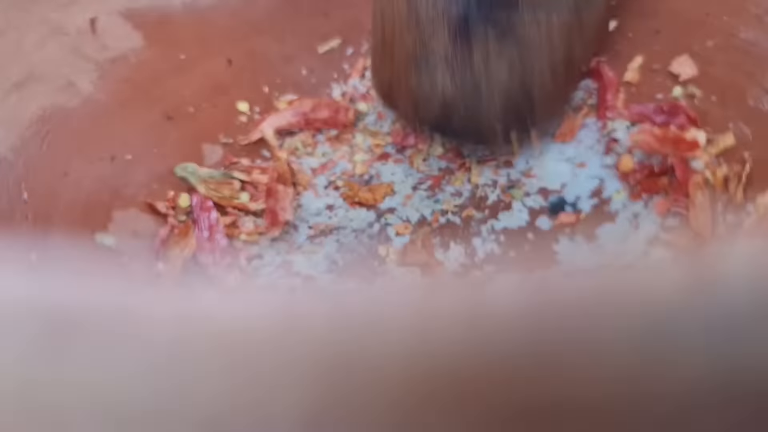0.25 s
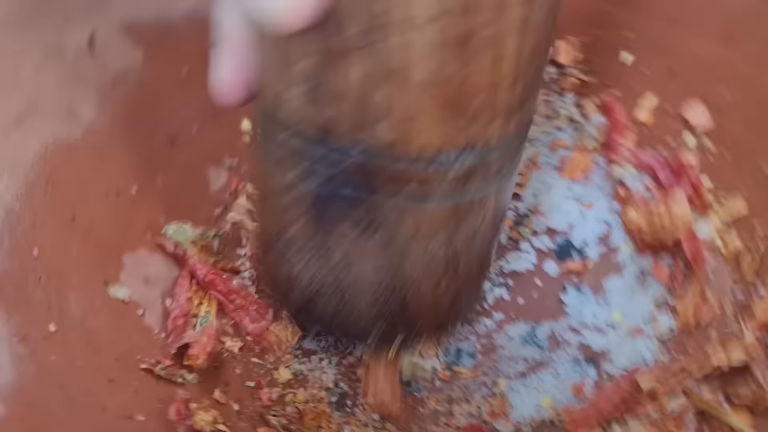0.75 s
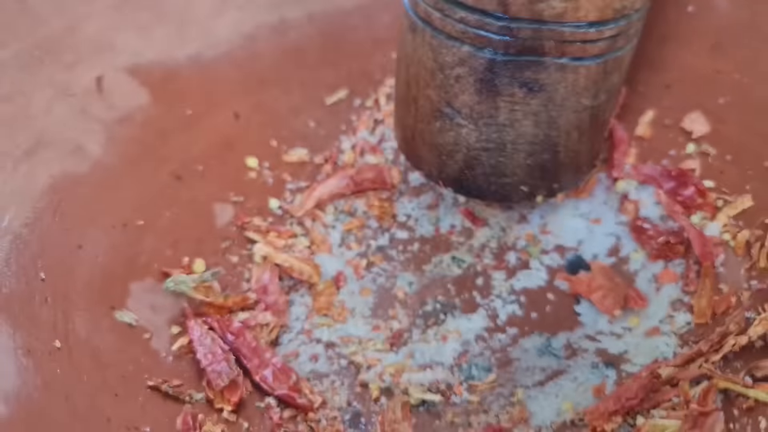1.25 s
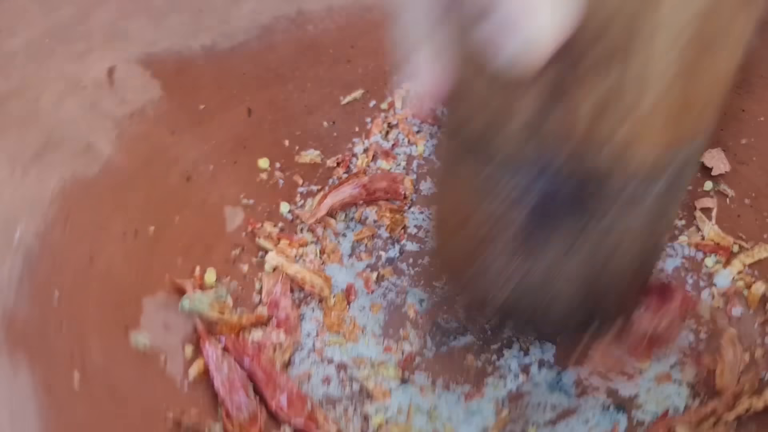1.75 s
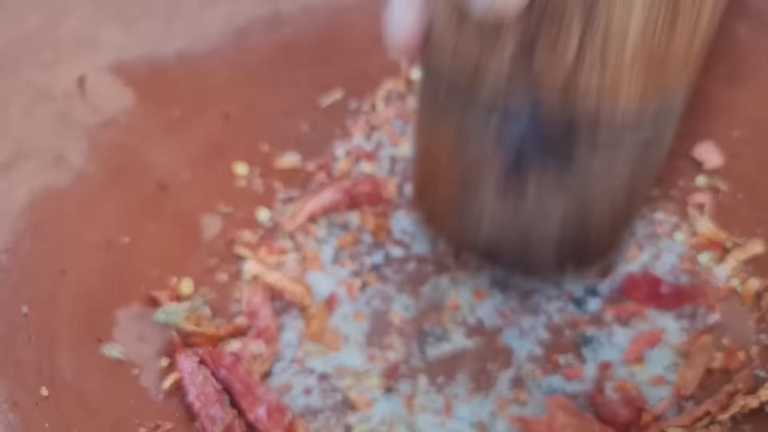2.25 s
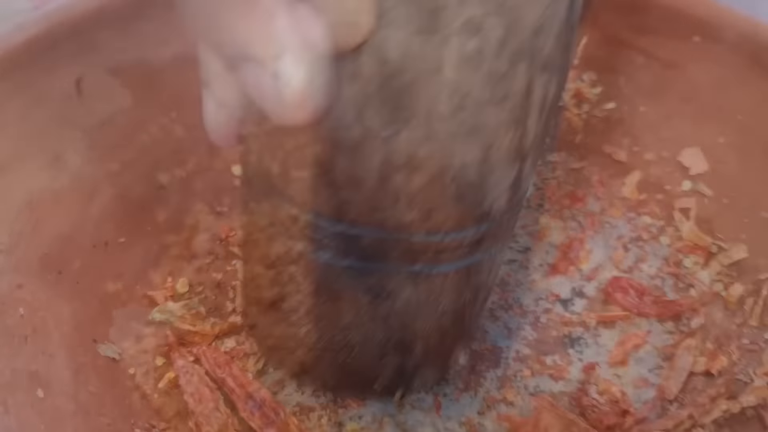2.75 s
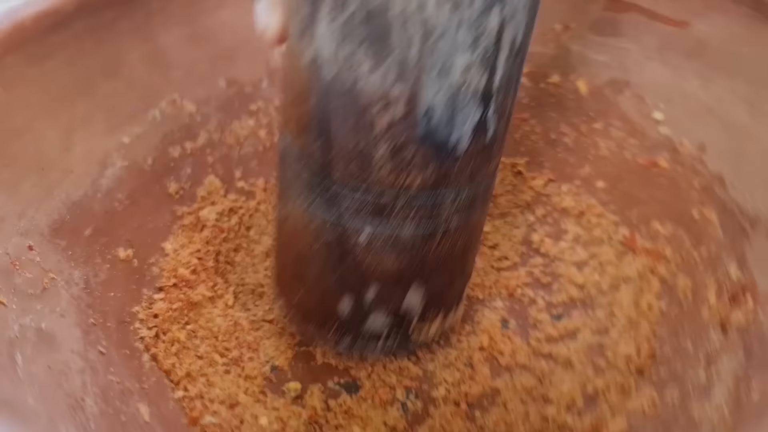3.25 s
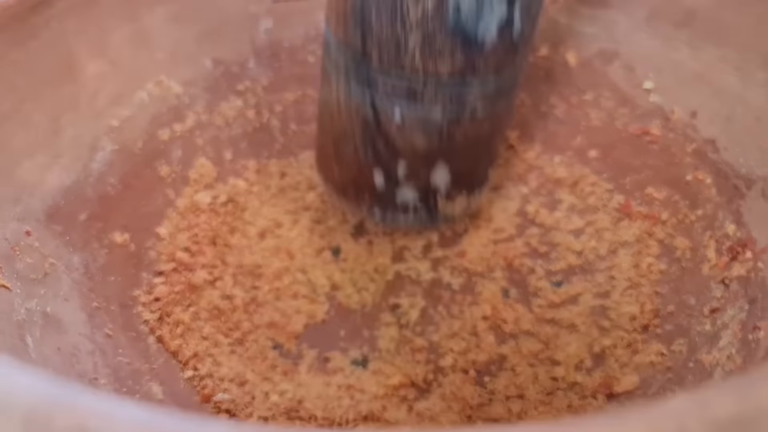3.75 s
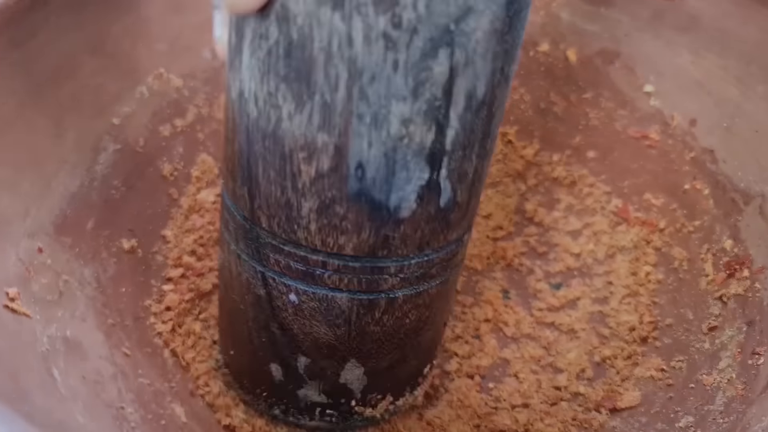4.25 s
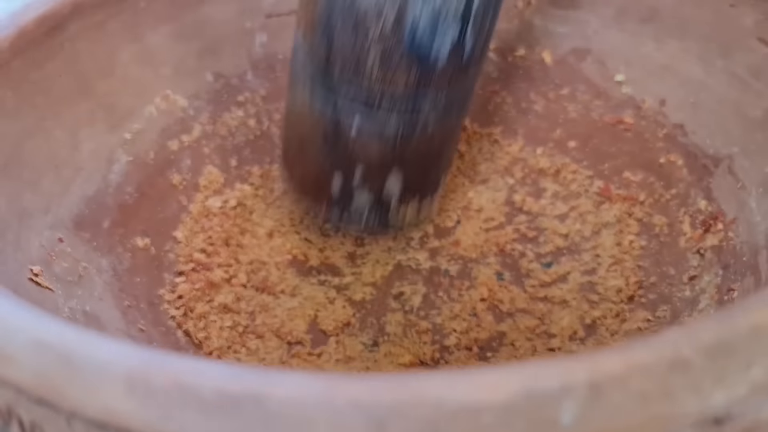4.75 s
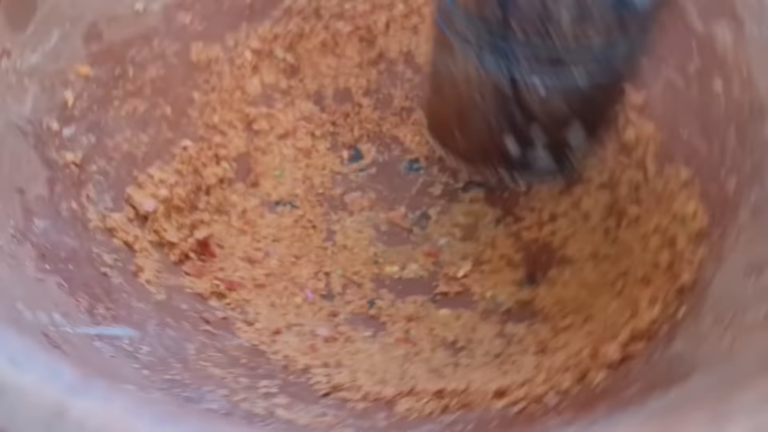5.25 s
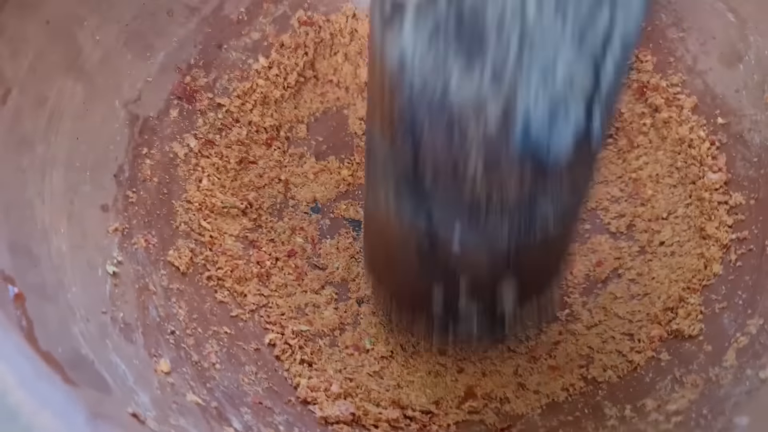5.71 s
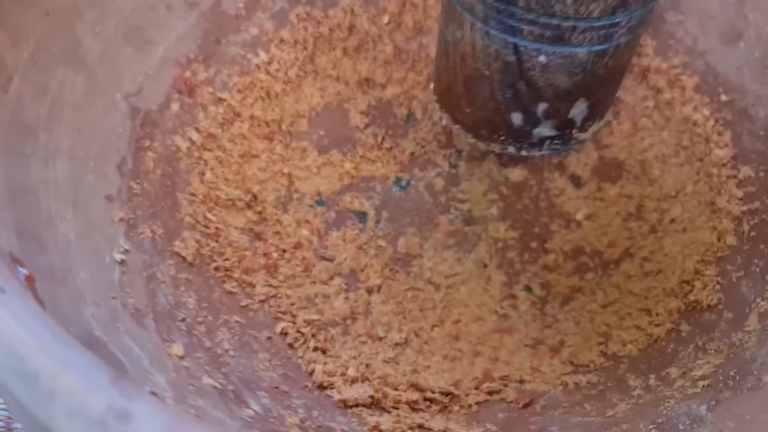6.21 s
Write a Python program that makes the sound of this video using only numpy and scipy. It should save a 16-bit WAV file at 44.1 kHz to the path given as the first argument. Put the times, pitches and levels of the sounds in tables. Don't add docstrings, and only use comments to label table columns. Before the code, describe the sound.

A wooden pestle scrubs salt and dried chilli to and fro in a clay bowl, gritty crunching strokes with low thuds, growing heavier and duller.

```python
import sys
import numpy as np
from scipy import signal
from scipy.fft import rfft, irfft
from scipy.io import wavfile
from scipy.ndimage import uniform_filter1d

SR = 44100
rng = np.random.default_rng(int(sys.argv[2]) if len(sys.argv) > 2 else 0)


def attenuation_scalar(level_db):
    decades = np.asarray(level_db, float) / 20
    return 10 ** decades


def waveform_to_disk(signal):
    frames = np.transpose(np.atleast_2d(signal))
    scaled = np.clip(frames, -1, 1) * 32767
    samples = np.round(scaled).astype(np.int16)
    wavfile.write(sys.argv[1], SR, samples)


N = 285561

# start_s, grit_db, lean_db (half the rise of force from early to #
# late), turn_db (left at the turn), weight_db
STROKES = [(0.012, -36.5, -4, -28, -36.5), (0.15, -43.5, 4, -8.5, -42), (0.254, -37, -3.5, -25, -55),
           (0.4, -36, 1, -9, -35), (0.565, -32.5, -4, -45, -44.5), (0.705, -34, 2, -26, -37),
           (0.867, -31.5, 6, -40, -46), (1, -39, 6, -33, -38), (1.081, -36.5, -8, 0, -34),
           (1.186, -36, -3.5, -23, -50), (1.329, -31, -0.5, -20, -31.5), (1.505, -101, 12, -10, -70),
           (1.721, -55, 3, -19, -58), (1.764, -32.5, -3, -30, -31.5),
           (1.923, -38.5, 6.5, -43, -41.5), (2.076, -31.5, 5, -28, -30),
           (2.234, -35, -2.5, -33, -43.5), (2.395, -30.5, -6, -22, -29),
           (2.532, -31.5, 2.5, -44, -35.5), (2.684, -31, -4, -29, -32.5),
           (2.867, -33.5, -4.5, -11.5, -41),
           (3.016, -34.5, -0.5, -11, -36), (3.179, -32, 1.5, -44, -34.5),
                  (3.344, -32.5, -2.5, -46, -42.5), (3.491, -32, -7.5, -11.5, -33.5),
                  (3.647, -34.5, -2, -23, -47), (3.808, -32.5, -3.5, -19, -33),
                  (3.957, -33.5, -1, -42, -45.5), (4.117, -31.5, -4, -25, -29.5),
                  (4.267, -34, -3.5, -40, -44), (4.431, -33, -11, -28, -33.5),
                  (4.579, -35.5, -2.5, -44, -42.5), (4.735, -31.5, -5.5, -40, -31.5),
                  (4.895, -32, -1.5, -17, -43.5), (5.055, -31.5, -4.5, -25, -32),
                  (5.19, -33.5, 0, -2.5, -52), (5.322, -33, -6, -8.5, -34), (5.431, -35, -2, -8, -37.5),
                  (5.535, -32.5, 0, -1.5, -43), (5.639, -33, -1.5, -19, -33.5), (5.788, -33, -4, -49, -42),
                  (5.943, -30.5, -7.5, -44, -29), (6.085, -33, -4, -44, -40.5),
                  (6.243, -29, -1, -22.5, -30.5), (6.389, -32.5, 5.5, -47, -37.5)]
# start_s, peak_db, push_ms
JOLTS = [(0.5927, -17, 1), (0.898, -20.5, 0.61), (0.935, -17.5, 0.61), (1.2022, -20.5, 1.5),
         (1.2351, -15.5, 1.34), (1.4038, -18, 1.4), (2.1723, -22, 1.8), (2.457, -17, 1.5),
         (2.5741, -17, 1.45), (2.728, -15.5, 1.25), (2.898, -23, 1.2), (3.2246, -21, 2.4),
         (3.3982, -13, 1.26), (3.5436, -14, 1.4), (3.8506, -7.5, 1.58), (4.1625, -16, 1.2),
         (4.3421, -15.5, 0.59), (4.4734, -12.5, 2.3), (4.7657, -10, 1.25), (5.0922, -8, 1.76),
         (5.1287, -13, 1.7), (5.1678, -5.5, 2.7), (5.356, -6, 1.45), (5.68, -7, 1.73), (5.6955, -7.5, 1.43),
         (5.7291, -6, 1.6), (5.7402, -11, 1.64), (5.993, -0.5, 1.47), (6.0385, -14.5, 1.8),
         (6.2965, -14, 2.1)]
# start_s, peak_db
KNOCKS = [(.016, -36), (.0215, -27), (.027, -7), (.0357, -10), (.0583, -27), (1.7373, -31), (1.744, -24),
          (1.7478, -27), (1.7515, -4.5), (1.7652, -13), (1.7715, -9.5), (1.7799, -8), (1.788, -20)]
# start_s, peak_db, pitch_hz
BUMPS = [(0.201, -27, 121), (0.281, -27, 109), (0.833, -19.5, 175), (1.068, -23.5, 153), (1.148, -28, 85),
         (2.638, -30, 95), (3.296, -19, 95), (3.621, -21, 98), (3.93, -20, 123), (4.2, -18, 65),
         (4.795, -19, 67.6), (4.825, -17.5, 68.6), (5.236, -26, 66.4), (5.461, -25, 112), (5.678, -21, 96),
         (6.003, -14.5, 106), (6.291, -16, 179), (6.324, -22.5, 181)]
# time_s, extra_top_db, powdered_share (0-1)
COARSE = [
    (0, 1, 0),
    (1.4, 1.2, 0.48),
    (1.8, 5.5, 0.23),
    (2.7, 0.5, 0.24),
    (3.3, 1.5, 1),
    (4.8, -6, 1),
    (5.3, 1, .9),
    (6.48, -9, 1),
]
# time_s, lumps_db, grit_db
SIDEWAYS = [
    (0.0, 9.5, 5),
    (1.02, 7, 5),
    (1.69, 2.5, 5.5),
    (2.79, 5, 2),
    (4.68, 1.5, 0),
    (6.47, -1.5, -1),
]
BOWL_HZ = [576, 540, 1212, 1175, 1385, 2058, 2170, 2457, 3000, 3325, 3578, 3876, 4096, 4576, 5040, 5485,
           6520, 8120]
# t60_s, scrubbed_db, knocked_db, left_minus_right_db, left_lead_rad
BOWL = [(0.58, -14.5, 1.5, 2, 3.5), (0.04, -5.5, 6, 11.5, 2.5), (0.1, 0, -7.5, -2, 0.68),
        (0.19, -12, -12, -1, 2.5), (0.16, -15, -6.5, -2.5, 3.5), (0.079, 2, -41, -2.5, -0.5),
        (0.073, -3, -38, 14, -2.5), (0.071, -17.5, -8, -14.5, 4), (0.017, -11, -38, 19, 8.5),
        (0.05, -2, -50.5, -3.5, 1.13), (0.026, -10, -32.5, 7, -2.5), (0.058, -10.5, -34, -4.5, 2),
        (0.027, -14.5, -17, 4.5, 6), (0.043, -11.5, -29, -5, 1.5), (0.028, -12.5, -14, 11, -3),
        (0.029, -16, -37, -18, 1), (0.023, -5.5, -44, 1.5, 5), (0.027, -21.5, -40, 11, 4.5)]
# pitch_hz, level_db
GRIT = [(300, -25.5), (700, 3), (1100, 1.5), (1700, -16.5), (2800, -6), (5000, -7), (7000, -11.5),
        (9000, -24), (11000, -18), (16000, -20)]
# pitch_hz, level_db
LUMPS = [(40, -34), (100, -2), (180, 4), (330, -6), (560, 8), (900, -25), (1500, -15.5), (4000, -51.5)]
# pitch_hz, level_db
KITCHEN = [(18, -25), (30, 4), (100, -9), (279, -26), (417, -15), (930, -27), (5660, -37), (6740, -36.5),
           (12000, -45), (15600, -77), (22000, -120)]


def hand():
    squareness, bias = 1.0, 0.98
    slide_s, soon_s, slide_db, drag_db = .022, .075, -7, -2
    burst_db, burst_s = 3, 0.015
    crumble_base_db, before_bite_db = -34, -3.5
    start, grit_db, lean_db, turn_db, weight_db = np.transpose(STROKES)
    t = np.arange(N) / SR
    k = np.clip(np.searchsorted(start, t) - 1, 0, None)
    end = np.append(start[1:], N / SR + 0.029)
    part = np.clip((t - start[k]) / (end[k] - start[k]), 0, 1)
    swell = np.sin(np.pi * part ** bias) ** squareness * attenuation_scalar(2 * lean_db[k] * (part - .5))

    jolts = np.transpose(JOLTS)[0]
    wait = jolts[np.minimum(np.searchsorted(jolts, start), len(jolts) - 1)] - start
    soon = (wait > 0) & (wait < soon_s)
    since_bite = t - start[k] - np.where(soon, wait, slide_s)[k]
    dragging = since_bite < 0
    drag = attenuation_scalar(np.where(soon, drag_db, slide_db))[k]
    burst = attenuation_scalar(burst_db * np.exp(-np.abs(since_bite) / burst_s))
    swell = uniform_filter1d(swell * np.where(dragging, drag, burst), 90)

    turn = attenuation_scalar(np.interp(t, start, grit_db + turn_db) - grit_db[k])
    down = grit_db[k] > -60
    speed = np.hypot(swell, turn) * down * (t > start[0])

    def hump(db, peak, fall_db):
        return uniform_filter1d(attenuation_scalar(db - fall_db * (2 * (part - peak)) ** 2), size=300)

    extra_weight_db = weight_db[k] - crumble_base_db

    def ring_feed(first_db, last_db, settle_s, per_weight_db):
        fading_db = last_db + (first_db - last_db) * np.exp(-t / settle_s)
        return attenuation_scalar(fading_db + per_weight_db * extra_weight_db)

    crumble_db = crumble_base_db + (0.88 + 0.085 * t) * extra_weight_db + before_bite_db * dragging
    weight = hump(weight_db[k], peak=.5, fall_db=16.4)
    crumble = hump(crumble_db, peak=0.36, fall_db=7.5)
    low = ring_feed(first_db=8, last_db=-3, settle_s=2, per_weight_db=0.01)
    middle = ring_feed(first_db=0.1, last_db=-20, settle_s=6.5, per_weight_db=0.13)
    return speed, speed * attenuation_scalar(grit_db[k]), weight, crumble, low, middle


def crackle(grit, shared, top_hz):
    burst = grains(14000, 2.3, count=3)
    both_ports = np.array([np.roll(burst[0], shift=4), burst[0]])
    hiss = mottle(colour(burst[1:] + shared * both_ports, GRIT), depth_db=5.0, ms=14, hz=500)
    top = signal.sosfilt(signal.butter(2, top_hz, "high", fs=SR, output="sos"), hiss)
    extra_top = attenuation_scalar(curves(COARSE)[0]) - 1
    return level(hiss + extra_top * top, -1.08) * grit


def bowl(grit, low, middle, knock, wander_db, place_db, apart_hz, deadening):
    out = np.zeros((2, N))
    wander = wander_db * walk(32, count=len(BOWL))
    place = place_db * walk(7, count=len(BOWL)) * np.less(1600, BOWL_HZ)[:, None]
    share = attenuation_scalar(wander + place)
    cracks = grains(2500, 3.3, count=3)
    powder = np.clip(curves(COARSE)[1], 0, 1)
    side = np.array([[.5], [-.5]])
    for k, (hz, (t60, scrub_db, knock_db, pan_db, lead)) in enumerate(zip(BOWL_HZ, BOWL)):
        apart = min(hz / apart_hz, .9)
        crack = np.sqrt(1 - apart) * cracks[0] + np.sqrt(apart) * cracks[1:]
        feed = low if hz < 1600 else middle if hz < 2600 else 1
        scrub = attenuation_scalar(scrub_db - 23.5) * share[k] * grit * feed * crack
        struck = attenuation_scalar(knock_db - 26.5) * knock
        if 600 < hz < 2600 or k == 1:
            mode = ring((1 - powder) * scrub + struck, hz, t60)
            mode += ring(powder * scrub / np.sqrt(deadening), hz, t60 * deadening)
        else:
            mode = ring(scrub + struck, hz, t60)
        out += attenuation_scalar(side * pan_db) * (mode * np.exp(1j * side * lead)).imag
    return out


def table_thuds(speed, weight, crumble, jolt, knock):
    push = rng.standard_normal((3, N))
    sway = ring(push[0] + 0.31 * push[1:], 75.4, 0.05)
    sway = (sway / np.abs(sway[:1]) ** 0.48).imag
    sway = level(colour(sway, [(20, -28.5), (55, 3.0), (120, -2.5), (300, -31.5)]), 0.26)
    rock = sway * weight * np.abs(uniform_filter1d(speed, 400)) ** 0.35
    crush = grains(700, 2.47, count=3)
    lumps = level(colour(crush[0] + 0.3 * crush[1:], LUMPS), 1.4) * crumble * speed ** 0.62
    thud = attenuation_scalar(-10.5) * ring(np.gradient(jolt), 544, 0.022).real
    thud = thud + attenuation_scalar(-2.5) * signal.lfilter([1, -1], [1, -.985], jolt)
    return rock + lumps + thud + attenuation_scalar(-29) * ring(knock, 407, 0.046).imag


def chatter(crumble):
    per_s, mean_db, spread_db, push_ms = 32, 6.5, 3.5, 2.07
    when, size, length = rng.random((400, 3)).T
    when = np.cumsum(-np.log(when) / per_s)
    rows = zip(when, mean_db - spread_db * np.log(size), push_ms * (.5 + length))
    return crumble * pushes([row for row in rows if row[0] < N / SR])


def bumps():
    cycles = 6.7
    swings = [ring(pushes([(s, db, .2)]), hz, cycles / hz).imag for s, db, hz in BUMPS]
    return sum(swings) / 5


def kitchen():
    air = rng.standard_normal(N) + 2.2 * rng.standard_normal((2, N))
    return level(colour(air, KITCHEN), -57.5)


def grains(rate, spread_db, count):
    hit, size, sign = rng.random((3, count, N))
    height = attenuation_scalar(np.minimum(-spread_db * np.log(size + 1e-9), 24))
    return level((hit < rate / SR) * np.sign(sign - .5) * height, 0)


def pushes(rows):
    force = np.zeros(N + 999)
    for s, db, ms in rows:
        pulse = np.sin(np.pi * np.arange(0, 1, 1000 / (SR * max(ms, .2))))
        start = int(s * SR)
        force[start:start + len(pulse)] += attenuation_scalar(db) * pulse
    return force[:N]


def ring(force, hz, t60):
    return signal.lfilter([1], [1, -np.exp((2j * np.pi * hz - np.log(1000) / t60) / SR)], force)


def mottle(x, depth_db, ms, hz, size=256):
    spec = signal.stft(x, nperseg=size)[2]
    field = rng.standard_normal(spec.shape)
    for axis, width in ((1, hz * size / SR), (2, ms * SR / size / 500)):
        field = uniform_filter1d(field, max(int(round(width)), 1), axis=axis)
    return signal.istft(spec * attenuation_scalar(depth_db * field / field.std()), nperseg=size)[1][:, :N]


def walk(rate, count):
    k = int(SR / rate)
    held = np.repeat(rng.standard_normal((count, N // k + 1)), k, axis=1)[:, :N].astype(np.float32)
    return np.sqrt(2) * uniform_filter1d(uniform_filter1d(held, k, axis=1), k, axis=1)


def curves(table):
    s, *columns = np.transpose(table)
    return [np.interp(np.arange(N) / SR, s, column) for column in columns]


def colour(x, table, size=8192):
    hz, db = np.transpose(table)
    log_hz = np.log(np.fft.rfftfreq(size, 1 / SR) + 1)
    cep = irfft(np.interp(log_hz, np.log(hz), db) * np.log(10) / 20)
    cep[1:size // 2] *= 2
    cep[size // 2 + 1:] = 0
    return signal.fftconvolve(x, np.atleast_2d(irfft(np.exp(rfft(cep)))), axes=1)[:, :N]


def level(x, db):
    return x * attenuation_scalar(db) / np.sqrt(np.mean(x ** 2))


def scene():
    lump_pan, grit_pan = (attenuation_scalar(np.outer([.5, -.5], db)) for db in curves(SIDEWAYS))
    speed, grit, weight, crumble, low, middle = hand()
    grit = grit * attenuation_scalar(1.85 * walk(45, count=1)[0])
    jolt = pushes(JOLTS)
    knock = pushes([(s, db, .42) for s, db in KNOCKS])
    hiss = grit_pan * crackle(grit, shared=0.77, top_hz=7000)
    rung = bowl(grit, low, middle, knock + attenuation_scalar(-29) * jolt,
                wander_db=3.5, place_db=2.5, apart_hz=7000, deadening=0.48)
    speed = np.minimum(speed, 1)
    jolt = jolt + chatter(crumble * speed)
    thuds = lump_pan * table_thuds(speed, weight, crumble, jolt, knock)
    return hiss + rung + thuds + bumps() + kitchen()


def band_limit(x):
    return signal.sosfilt(signal.butter(12, 16850, fs=SR, output="sos"), x)


def record(dry):
    bass_cut = signal.butter(2, 36, "high", fs=SR, output="sos")
    top_cut = signal.ellip(10, .2, 70, 15850, fs=SR, output="sos")
    rounded = np.tanh(1.046 * signal.sosfilt(bass_cut, dry)) / 0.95
    return band_limit(signal.sosfilt(top_cut, rounded))


dry = scene()
out = record(dry)
waveform_to_disk(out)
```